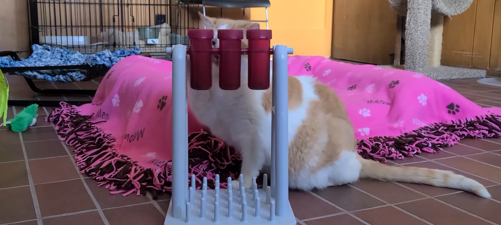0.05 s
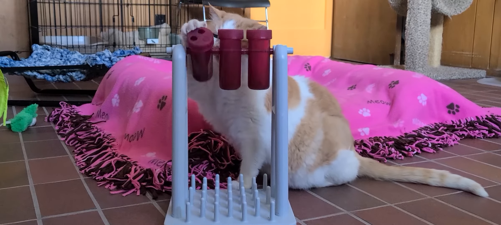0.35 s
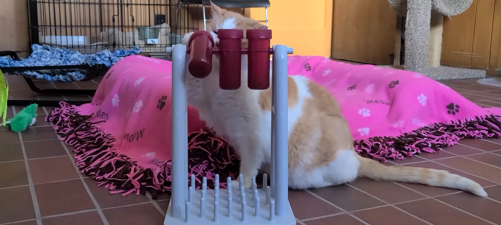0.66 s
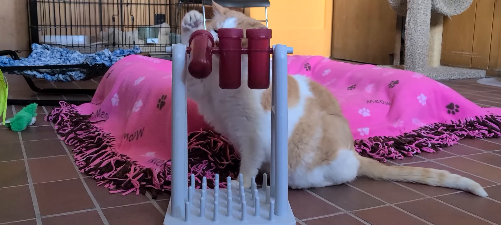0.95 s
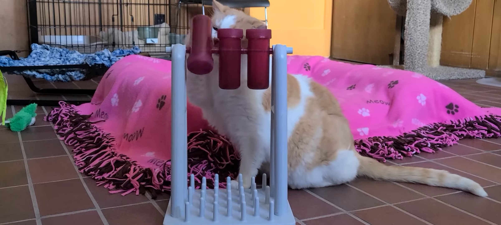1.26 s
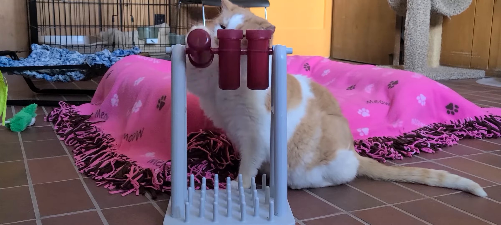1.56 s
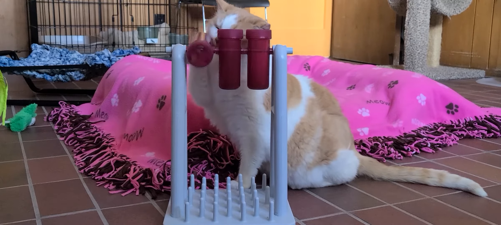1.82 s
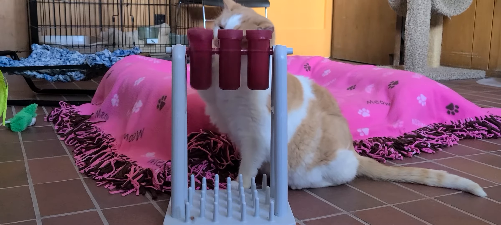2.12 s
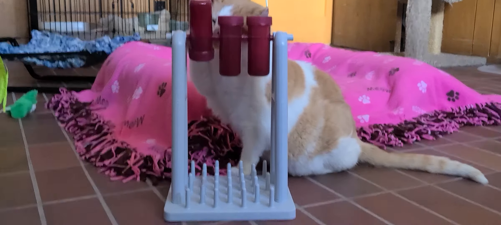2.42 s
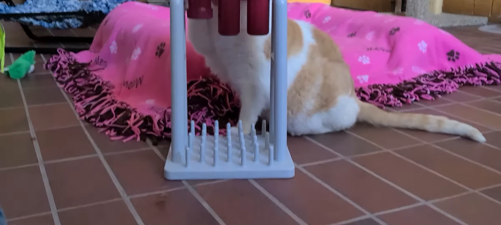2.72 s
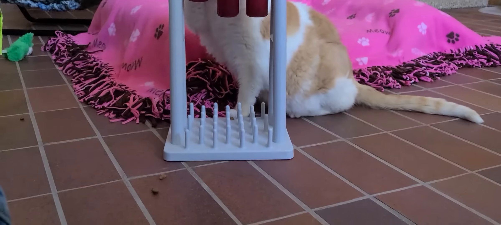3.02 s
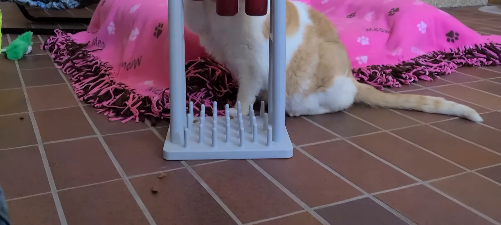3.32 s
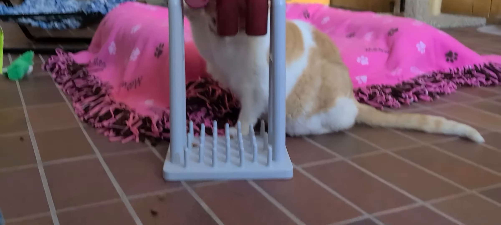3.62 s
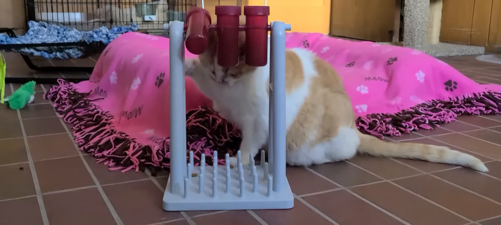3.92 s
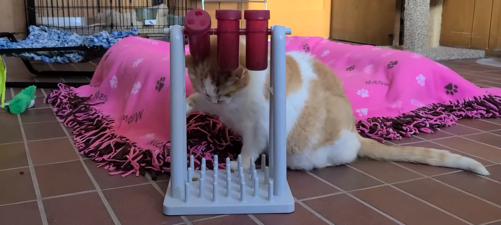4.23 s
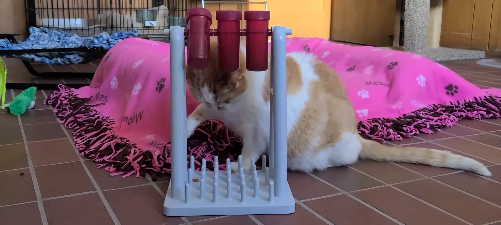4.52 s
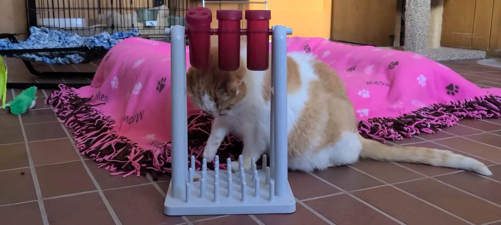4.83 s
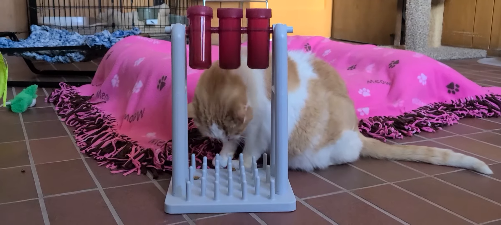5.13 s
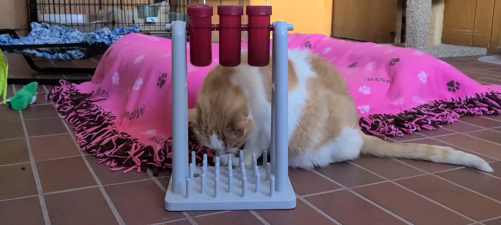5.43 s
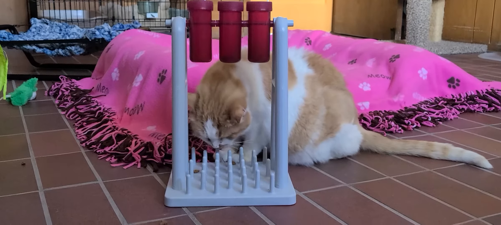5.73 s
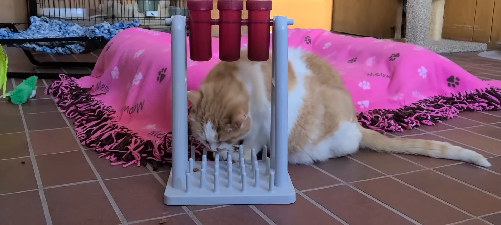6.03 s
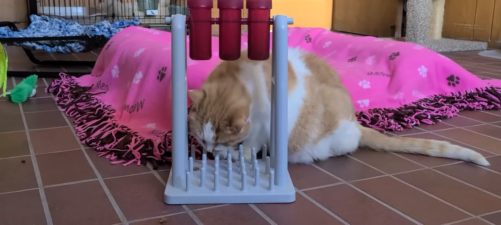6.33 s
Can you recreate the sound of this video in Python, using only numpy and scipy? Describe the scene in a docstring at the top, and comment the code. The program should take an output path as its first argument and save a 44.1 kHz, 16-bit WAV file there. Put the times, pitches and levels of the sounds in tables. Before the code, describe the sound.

In a quiet tiled room, a cat paws at a plastic treat puzzle close to the microphone. A few light clicks grow into an uneven burst of hollow clacks, with a beaker juddering on its axle, dry treats ticking inside and claws brushing the plastic. The microphone takes a low bump midway through the rattling. The clatter stops, leaving soft shuffles and two very faint bites over low room tone.

```python
"""A quiet room with a tiled floor, where a cat paws at a plastic treat puzzle close by.
A beaker judders on its axle and clacks against a hollow, ringing frame; dry treats tick and hop
inside it, and fur and claws brush the plastic. A handheld camera is bumped as it moves.
Afterwards the cat shuffles softly and bites a treat, over low room tone."""
import sys
import numpy as np
from scipy import signal
from scipy.fft import rfft, irfft
from scipy.io import wavfile
from scipy.ndimage import uniform_filter1d

SR = 44100
rng = np.random.default_rng(int(sys.argv[2]) if len(sys.argv) > 2 else 0)


def to_wav(sig):
    """Store sig (one row per channel, or 1-D mono) as 16-bit WAV at the path in sys.argv[1].

    Samples outside -1..1 are clipped; the rate is SR.
    """
    pcm = np.clip(np.atleast_2d(sig), -1, 1) * 32767
    pcm = np.round(pcm).astype(np.int16)
    wavfile.write(sys.argv[1], SR, pcm.T)  # frames by channels


N = 289296
CONTACT_S = .005  # span over which a contact's level is set
# modes of beaker and frame: f/Hz, level/dB, t60/s
PLASTIC_MODES = [(300, -22.5, 0.056), (736.3, -12.5, .06), (1014.6, -5, 0.014), (1234, -5.5, 0.035),
                 (1320, -9, 0.048), (1620, -12.5, 0.0084), (1907.5, -7, 0.031), (2181, 4, 0.021),
                 (2647, -6, 0.02), (3349, 1.5, 0.018), (5820, 1, .014), (7132, -5, .012)]


def amp(db):
    """Decibels to gain."""
    return 10 ** (np.asarray(db) / 20)


def unit_rms(x):
    """Scales to rms 1."""
    return x / np.sqrt(np.mean(x ** 2) + 1e-20)


def curve(points, hz):
    """Interpolates a table over log frequency."""
    f, value = np.transpose(points)
    return np.interp(np.log(hz + 1), np.log(f + 1), value)


def add(mix, at_s, sound):
    """Mixes in a stereo sound."""
    part = mix[:, round(at_s * SR):][:, :sound.shape[1]]
    part += sound[:, :part.shape[1]]


def butter(x, hz, kind, order=2):
    """Butterworth filter."""
    return signal.sosfilt(signal.butter(order, hz, kind, fs=SR, output="sos"), x)


def stereo_noise(count, corr):
    """White noise with channel correlation corr."""
    a, b = rng.standard_normal((2, count))
    return np.array([a, corr * a + np.sqrt(1 - corr ** 2) * b])


def contact(modes, crack_db, crack_s, scatter_db, spread_rad):
    """One impact: a broad, dry crack plus modes whose strengths depend on where it lands."""
    # puzzle's bias, left over right: f/Hz, level/dB
    left_bias = [(1100, 1.5), (2000, -7.5), (2800, -5), (4200, -1), (7500, 2), (12000, -2)]
    # crack spectrum: f/Hz, level/dB
    crack_spectrum = [(450, -14), (1300, -5.5), (3300, 2.5), (4400, -2.5), (6000, 1.5), (7400, -3.5),
                      (9000, -15.5), (11400, -7), (16000, -18)]
    hz, db, t60 = np.transpose(modes)[:, :, None]
    t = np.arange(SR // 12) / SR
    size, detune, phase, apart = rng.standard_normal((4, len(modes), 1))
    side = np.array([.5, -.5])[:, None, None]
    # short waves reach the two microphones out of step
    skew = side * apart * spread_rad * np.sqrt(hz / hz.mean())
    angle = 2 * np.pi * (hz * (1 + 0.023 * detune) * t + phase) + skew
    attack = 1 - np.exp(-t / 0.00034)
    decay = np.exp(-np.log(1000) * t / t60)
    gain = amp(db + scatter_db * size + side * curve(left_bias, hz))
    ring = (gain * decay * np.sin(angle)).sum(1) * attack
    # countless damped modes overlap: no single pitch
    burst = rfft(stereo_noise(len(t), 0.38) * attack * np.exp(-t / crack_s))
    f = np.fft.rfftfreq(len(t), 1 / SR)
    colour = amp(curve(crack_spectrum, f) + side[:, 0] * curve(left_bias, f))
    crack = irfft(burst / (abs(burst) + 1e-12) * colour, len(t)) * np.exp(-t / (10 * crack_s))
    return unit_rms(ring) + amp(crack_db) * unit_rms(crack)


def set_bands(x, length_s, mid_db, body_db, snap_db, top_db, edges_hz=(1700, 4500, 9000)):
    """Sets rms over length_s in four rising bands: body (re mid), mid, snap (re mid), top (re snap)."""
    count = x.shape[1]
    spectrum = np.fft.fft(x)
    band = np.searchsorted(edges_hz, abs(np.fft.fftfreq(count, 1 / SR)))
    rms = np.sqrt(np.bincount(band, (abs(spectrum) ** 2).mean(0)) / (count * length_s * SR))
    gain = amp(mid_db + np.array([body_db, 0, snap_db, snap_db + top_db])) / rms
    log_gain = uniform_filter1d(np.log(gain[band]), size=41, mode="wrap")
    return np.fft.ifft(spectrum * np.exp(np.conj(signal.hilbert(log_gain)))).real  # minimum phase


def room_tone(level_db=-67, left_db=-1):
    """Low room rumble and faint microphone hiss."""
    # noise density: f/Hz, relative level/dB
    density = [(20, -9.5), (48, 3.5), (75, -11.5), (120, -18), (230, -16), (380, -27.5), (1300, -30),
               (3500, -36), (4400, -31), (5000, -41.5), (7000, -39.5), (9200, -50), (13400, -35),
               (16000, -47)]
    hz = np.fft.rfftfreq(N, 1 / SR)
    a, b = rfft(stereo_noise(N, 0))
    corr = curve([(100, 0.94), (1500, 0.14)], hz)
    white = np.array([a, corr * a + np.sqrt(1 - corr ** 2) * b])
    tone = irfft(white * amp(curve(density, hz)), N)
    return amp(level_db) * unit_rms(tone * amp([[left_db], [0]]))


def judder(length_s, db, slips_per_s=500, soft_hz=2400, low_hz=520, colour_db=3.5):
    """Stick-slip on the axle: a run of blunt contacts, coloured by where the paw holds the beaker."""
    force_db = db + 54  # firmer is brighter
    body_db, snap_db = 2.5 - 0.2 * force_db, -20 + 0.23 * force_db
    hz, mode_db, t60 = np.transpose(PLASTIC_MODES)
    held_modes = np.transpose([hz, mode_db + colour_db * rng.standard_normal(len(hz)), t60])
    run = np.zeros((2, SR // 8))
    count = max(2, round(length_s * slips_per_s))
    for k, (late, size) in enumerate(rng.random((count, 2))):
        slip = contact(held_modes, crack_db=-1.5, crack_s=0.00092, scatter_db=3, spread_rad=0.36)
        add(run, length_s * (k + .5 * late) / count, (0.19 + size) * slip)
    blunt = butter(run, soft_hz, "lowpass", order=7) + amp(snap_db) * run
    blunt = butter(blunt, low_hz, "highpass", order=3)
    return set_bands(blunt, length_s, db, body_db, snap_db, top_db=-13)


def beaker_judders(rock_back_s=0.036, rock_back_db=-14.5):
    """Each push makes the beaker judder, then rock back once, more gently."""
    # pushes: t/s, length/s, mid level/dB
    pushes = [(0.085, 0.014, -54.5), (0.289, .008, -54), (0.734, 0.0087, -67), (1.176, 0.0066, -50),
              (1.276, 0.017, -42), (1.485, 0.011, -49.5), (1.536, .012, -39.5), (1.74, 0.012, -40.5),
              (1.771, .009, -35.5), (1.805, .011, -27.5), (1.827, 0.021, -33.5), (2.061, 0.017, -46.5),
              (2.291, .007, -31.5), (2.759, .01, -45.5), (2.801, 0.0091, -36.5), (2.975, 0.022, -46),
              (3.03, 0.015, -29.5), (3.171, 0.016, -54), (3.207, 0.0064, -50), (3.357, .008, -34),
              (3.403, 0.018, -40)]
    out = np.zeros((2, N))
    for at_s, length_s, db in pushes:
        add(out, at_s, judder(length_s, db))
        add(out, at_s + rock_back_s, judder(length_s, db + rock_back_db))
    return out


def brushes(grains_per_s=350, uneven_db=8, spots=8, rub_hz=(1200, 8000), swish_hz=(5510, 6260)):
    """Fur, claws and crumbs catch on the plastic at many spots; claws add a thin swish."""
    # strokes: t/s, length/s, level/dB
    strokes = [(0.102, 0.068, -70.5), (0.311, 0.057, -56.5), (0.378, 0.059, -70), (0.574, 0.095, -77.5),
               (0.744, 0.072, -65), (1.093, 0.081, -68.5), (1.347, 0.12, -43), (1.783, 0.083, -40.5),
               (1.873, 0.03, -39), (2.165, 0.25, -58), (2.52, .04, -53.5), (2.746, 0.066, -61.5)]
    out = np.zeros((2, N))
    for at_s, length_s, db in strokes:
        count, rub = round(length_s * SR), 0
        envelope = signal.windows.tukey(count)
        for on_spot in rng.integers(0, spots, count) == np.arange(spots)[:, None]:
            catches = rng.random(count) < grains_per_s / SR
            grains = catches * amp(uneven_db * np.minimum(rng.exponential(1, count), 3))
            body = contact(PLASTIC_MODES, crack_db=4.5, crack_s=0.0018, scatter_db=-3, spread_rad=0.87)
            rub = rub + signal.fftconvolve((on_spot * grains * envelope)[None], body, axes=1)
        rub = unit_rms(butter(rub, rub_hz, "bandpass", order=1)) * np.sqrt(count / rub.shape[1])
        add(out, at_s, amp(db) * rub)
        swish = unit_rms(butter(stereo_noise(count, 0.37), swish_hz, "bandpass") * envelope)
        swish_db = -5 - .15 * (db + 69)  # stands out most in light strokes
        add(out, at_s, amp(db + swish_db) * swish)
    return out


def treat_tick(db, body_db, snap_db):
    """One dry snap of a treat."""
    # treat modes: f/Hz, level/dB, t60/s
    modes = [(3070, -2.5, 0.014), (3700, -2.5, 0.02), (6100, 1, 0.02)]
    tick = contact(modes, crack_db=2, crack_s=0.00053, scatter_db=2.5, spread_rad=1.6)
    return set_bands(tick, CONTACT_S, db, body_db, snap_db, top_db=-13)


def small_ticks():
    """Treats shift in the beaker and tick against each other; a few light knocks of the beaker on the frame
    sound the same way."""
    # treat ticks and light beaker knocks: t/s, mid level/dB
    ticks = [(.131, -61.5), (0.144, -73), (0.51, -63), (0.7765, -55), (1.258, -39.5), (1.3656, -39.5),
             (1.374, -37), (1.506, -48), (1.589, -42.5), (1.603, -48.5), (1.898, -49), (1.905, -46.5),
             (1.9453, -47.5), (2.103, -55.5), (2.244, -47), (2.2537, -45), (2.731, -40.5), (2.82, -54),
             (2.854, -57.5), (3.271, -42.5), (3.3894, -45.5)]
    out = np.zeros((2, N))
    for at_s, db in ticks:
        add(out, at_s, treat_tick(db, body_db=-14, snap_db=-2))
    return out


def beaker_clacks(rebound_db=-1):
    """The beaker hits the frame, plastic on plastic; some hits rebound and strike again."""
    # hits: t/s, mid level/dB, body/dB, snap/dB, top/dB, rebound delay/s (0: none)
    hits = [(.34, -42, -12, -0.5, -12, 0), (0.988, -55.5, -12, 4.5, -17, 0),
            (1.2284, -38, -8.5, -2.5, -9, 0.0003), (1.245, -29, -2.5, -2.5, -8, 0.003),
            (1.335, -36.5, -17, 2, -4, 0.0074), (1.6204, -25, -8.5, 1, -7.5, 0),
            (1.6257, -30, -8.5, 2, -9, 0), (2.046, -57, -12, -1.5, 3, 0.0069),
            (2.2794, -27.5, -16.5, -7.5, -11.5, 0), (2.3148, -36.5, -9.5, -4, -14.5, .015),
            (2.403, -35.5, -11.5, -1.5, -10.5, 0.00056), (2.433, -24, -6.5, -3, -3, 0.0022),
            (2.5568, -28, -15, 2, -10, 0), (2.6452, -55, -0.5, 8.5, -1, 0.0013),
            (2.6639, -42, -2, 4, -4.5, 0), (2.748, -35.5, -10.5, 1.5, -6, 0),
            (3.12, -28.5, -8, -0.5, -11, 0.0022), (3.2498, -37, -9, -4, -33, 0.000084),
            (3.2555, -34, -8, -2, -7.5, 0.00086), (3.3402, -33, -13.5, -2.5, -14, 0.011)]
    out = np.zeros((2, N))
    for at_s, db, body_db, snap_db, top_db, delay_s in hits:
        strikes = [(at_s, db)]
        if delay_s > 0:
            strikes.append((at_s + delay_s, db + rebound_db))
        for strike_s, strike_db in strikes:
            blow = contact(PLASTIC_MODES, crack_db=1.5, crack_s=0.001, scatter_db=3, spread_rad=2.45)
            add(out, strike_s, set_bands(blow, CONTACT_S, strike_db, body_db, snap_db, top_db))
    return out


def paw_shuffles():
    """Paws scuff blanket and base: muffled noise that starts quickly and fades."""
    # scuffs: t/s, length/s, level/dB, low edge/Hz, high edge/Hz
    scuffs = [(0.753, 0.065, -64.5, 209, 368.4), (1.536, 0.52, -66.5, 124, 300),
              (4.295, 0.069, -61, 565, 1160), (4.3, 0.073, -62, 140.3, 270), (5.023, 0.042, -75, 623, 880),
              (5.03, 0.11, -59.5, 129, 271)]
    out = np.zeros((2, N))
    for at_s, length_s, db, low_hz, high_hz in scuffs:
        progress = np.linspace(0, 1, round(length_s * SR))
        envelope = progress ** 0.064 * (1 - progress) ** 0.39
        noise = butter(stereo_noise(len(progress), 0.93), [low_hz, high_hz], "bandpass", order=3)
        add(out, at_s, amp(db) * unit_rms(noise * envelope))
    return out


def treat_bounces():
    """A treat hops along the beaker; the hollow wall answers with an almost pure knock."""
    # hops: t/s, mid level/dB
    hops = [(1.3897, -23), (1.4067, -23.5), (1.4214, -31), (1.4426, -43), (1.4504, -38), (1.695, -46),
            (1.887, -32.5), (2.196, -43.5), (2.3286, -34), (2.624, -50), (2.651, -38.5)]
    # beaker wall modes: f/Hz, level/dB, t60/s
    wall_modes = [(2270, 0, 0.021), (2540, -1.5, 0.016), (6360, -13.5, 0.019)]
    out = np.zeros((2, N))
    for at_s, db in hops:
        tap = contact(wall_modes, crack_db=-11.5, crack_s=0.0008, scatter_db=3.5, spread_rad=.94)
        add(out, at_s, set_bands(tap, CONTACT_S, db, body_db=-22, snap_db=-17, top_db=-12))
    return out


def camera_handling(grip_db=-78.5, sway_s=.06, sway_hz=60, thud_s=0.0049, tick_s=0.00069):
    """Grip rumble, shoves and bumps travel through the camera body; the bass lies to the right."""
    # soft shoves of the hand: t/s, level/dB
    shoves = [(2.385, -50), (2.455, -46), (2.571, -45.5), (2.68, -46)]
    # bumps: t/s, thud level/dB, thud f/Hz, tick level/dB
    bumps = [(2.5261, -26.5, 91.9, -26), (2.68, -43, 120, -70), (3.6171, -82, 100, -36.5)]
    bass = amp(grip_db) * unit_rms(butter(stereo_noise(N, 0.86), [45, 95], "bandpass"))
    ticks = np.zeros((2, N))
    t = np.arange(SR // 10) / SR
    for at_s, db in shoves:
        sway = amp(db) * np.sin(np.pi * np.minimum(t / sway_s, 1)) * np.sin(2 * np.pi * sway_hz * t)
        add(bass, at_s, sway[None])
    for at_s, thud_db, hz, tick_db in bumps:
        thud = amp(thud_db) * np.exp(-t / thud_s) * np.cos(2 * np.pi * hz * t)
        add(bass, at_s, butter(thud[None], 570, "lowpass"))
        noise = butter(stereo_noise(len(t), 0.24), [1100, 9000], "bandpass", order=1)
        add(ticks, at_s, amp(tick_db) * noise * np.exp(-t / tick_s))
    return bass * amp([[-10], [3]]) + ticks


def cat_bites(crumble_s=.008, snaps=4, step_db=-2):
    """A treat cracks between the teeth, then crumbles in weaker snaps."""
    # bites: t/s, mid level/dB
    bites = [(5.498, -69.5), (5.595, -76.5)]
    out = np.zeros((2, N))
    for at_s, db in bites:
        for k in range(snaps):
            snap_s = at_s + crumble_s * (k + .5 * rng.random())
            add(out, snap_s, treat_tick(db + step_db * k, body_db=-4, snap_db=-6))
    return out


def frame_ring(knocks, q=76):
    """The hollow frame rings on after every knock."""
    # frame resonances: f/Hz, gain/dB
    peaks = [(740, -10.5), (1238, -6), (1895, -0.5)]
    return sum(amp(db) * signal.lfilter(*signal.iirpeak(hz, q, fs=SR), knocks) for hz, db in peaks)


def room_response(first_s=0.003, dense_s=.17, coherent_hz=650):
    """Reflections off tiles and walls: sparse, then denser; the treble dies first."""
    # echo decay: f/Hz, t60/s
    decay_times = [(300, 0.87), (800, 0.23), (6000, 0.21), (14000, 0.11)]
    # echo colour: f/Hz, level/dB
    colour = [(700, -4.5), (3000, -6.5), (12000, -6)]
    count = SR // 2
    density = np.minimum((np.arange(count) / SR / dense_s) ** 2 + .01, 1)
    taps = rng.standard_normal((2, count)) * (rng.random(count) < density) / np.sqrt(density)
    taps[:, :round(first_s * SR)] = 0
    hz, t, spectra = signal.stft(taps, SR, nperseg=256)
    corr = 1 / (1 + (hz[:, None] / coherent_hz) ** 2)  # bass alike in both channels
    spectra[1] = corr * spectra[0] + np.sqrt(1 - corr ** 2) * spectra[1]
    t60 = curve(decay_times, hz)[:, None]
    spectra *= np.exp(-np.log(1000) * t / t60) / np.sqrt(t60)
    norm = np.linalg.norm(signal.istft(spectra, SR, nperseg=256)[1][0])
    return signal.istft(spectra * amp(curve(colour, hz))[:, None], SR, nperseg=256)[1] / norm


def room_echo(x, drift_hz=1.3):
    """The echo changes as beaker, cat and camera move: four responses, crossfaded."""
    fast = 2 * np.pi * drift_hz * np.arange(N) / SR
    slow = fast / np.pi
    fades = [a * b for a in (np.cos(fast), np.sin(fast)) for b in (np.cos(slow), np.sin(slow))]
    return sum(signal.fftconvolve(x * fade, room_response(), axes=1)[:, :N] for fade in fades)


def scene():
    """Puzzle and cat in the room, plus handling noise and room tone."""
    knocks = beaker_clacks() + beaker_judders() + treat_bounces() + small_ticks() + brushes()
    sources = knocks + frame_ring(knocks) + paw_shuffles() + cat_bites()
    direct = np.array([sources[0], np.roll(sources[1], 1)])  # right microphone slightly farther away
    return direct + room_echo(sources) + camera_handling() + room_tone()


def record(dry, edge_hz=16100):
    """The recorder's band limit."""
    lowpass = signal.firwin(255, edge_hz, window=("kaiser", 8), fs=SR)
    return signal.oaconvolve(dry, lowpass[None], "same")


dry = scene()
out = record(dry)
to_wav(out)
```